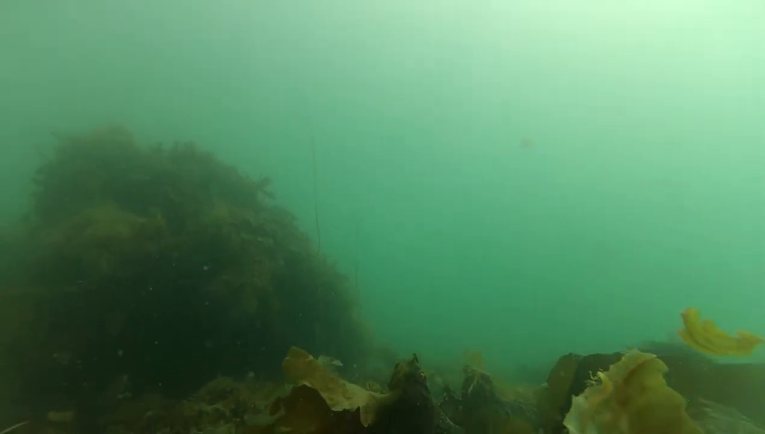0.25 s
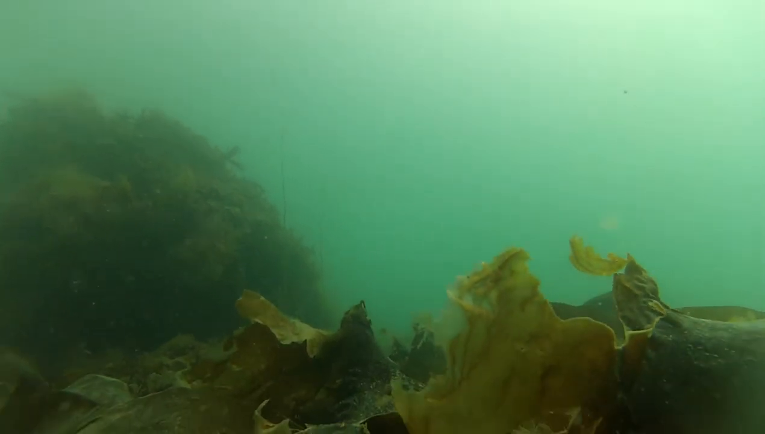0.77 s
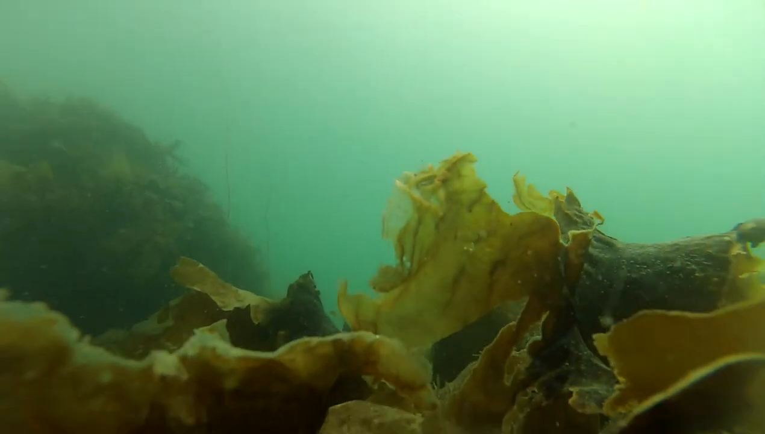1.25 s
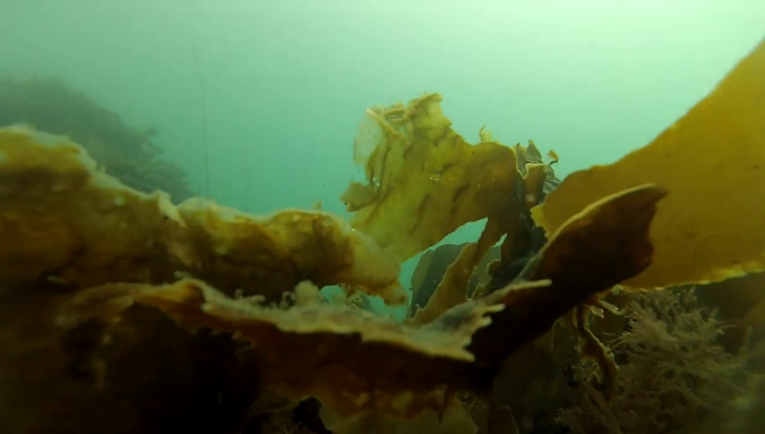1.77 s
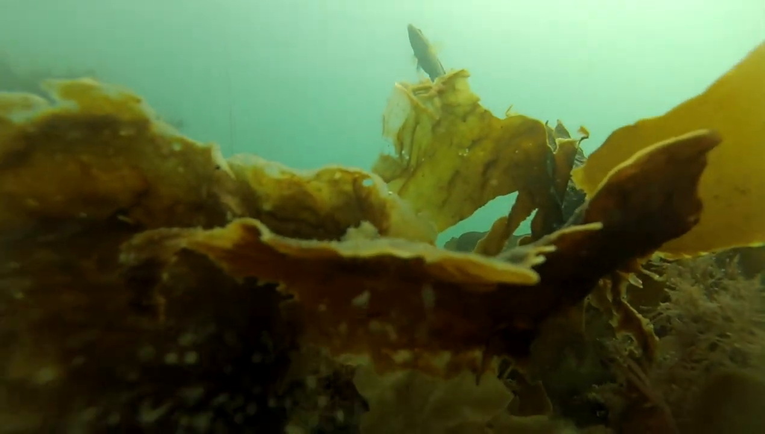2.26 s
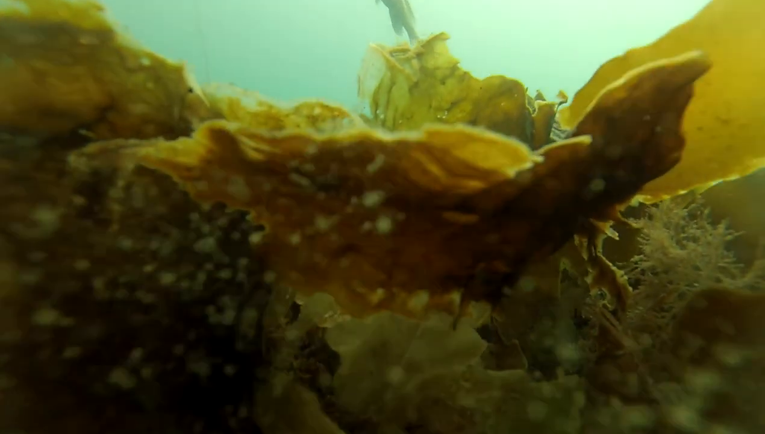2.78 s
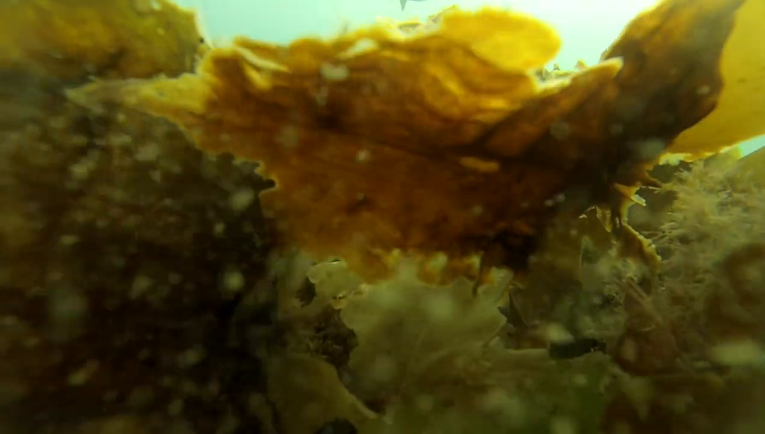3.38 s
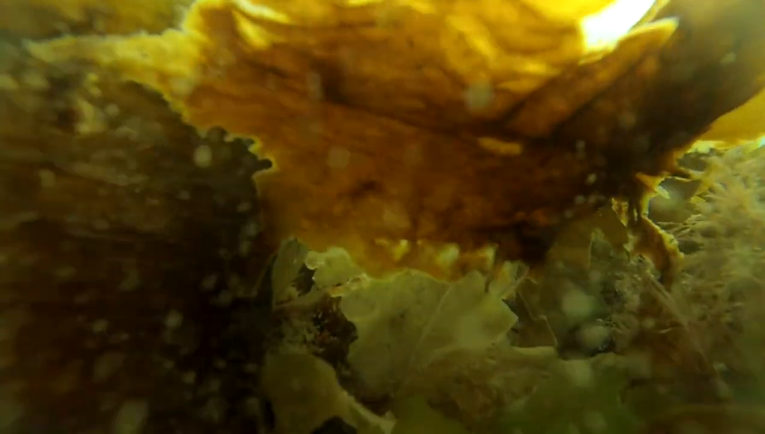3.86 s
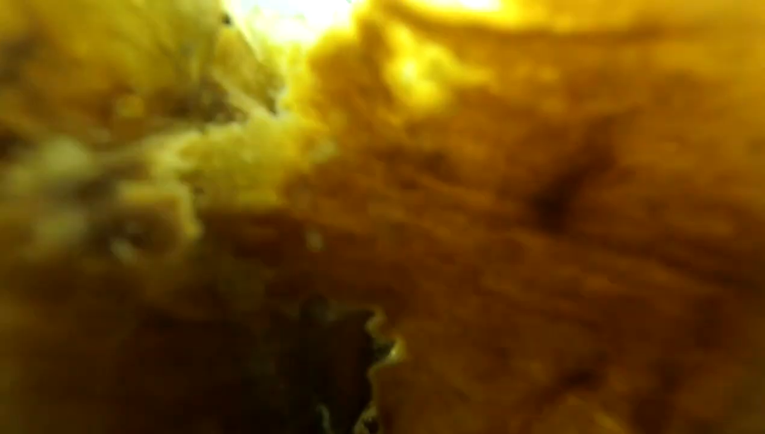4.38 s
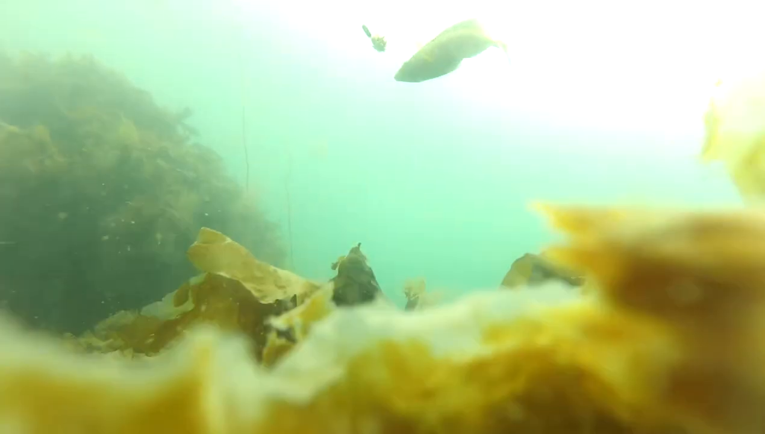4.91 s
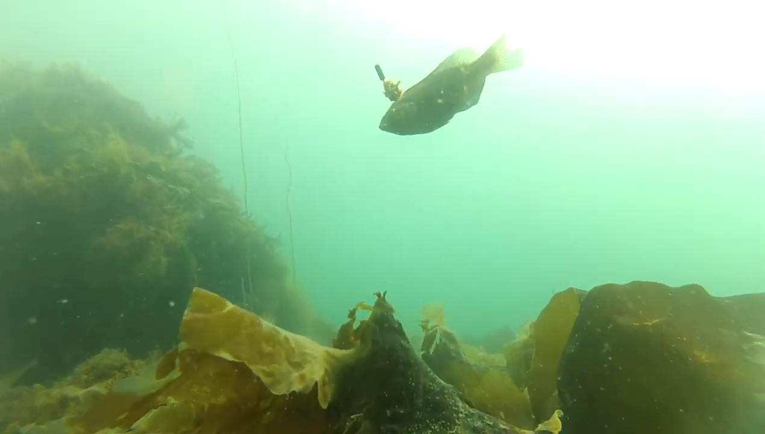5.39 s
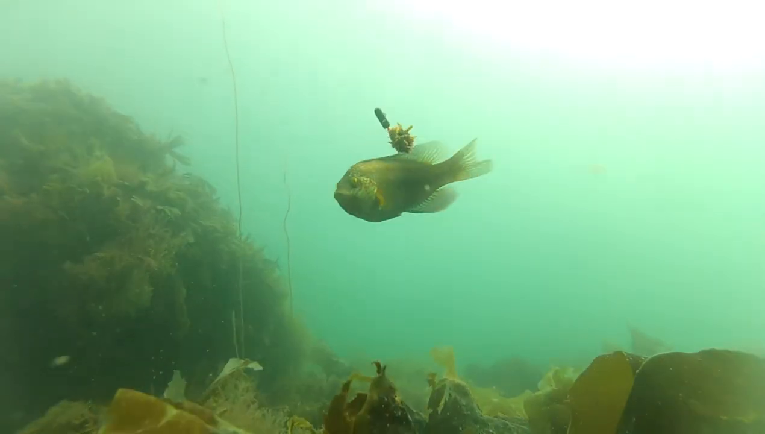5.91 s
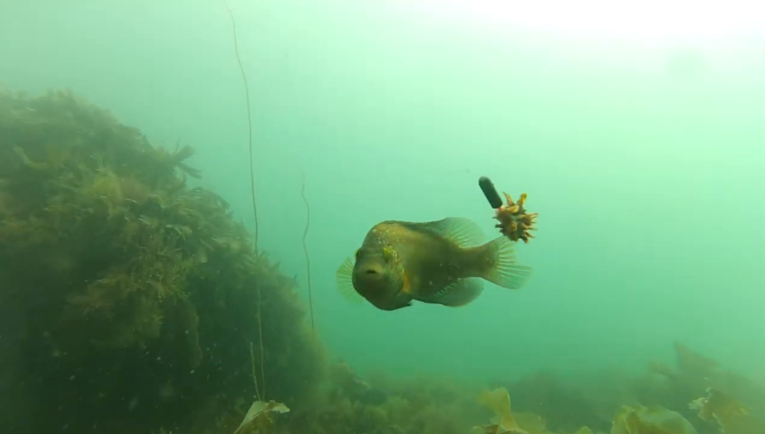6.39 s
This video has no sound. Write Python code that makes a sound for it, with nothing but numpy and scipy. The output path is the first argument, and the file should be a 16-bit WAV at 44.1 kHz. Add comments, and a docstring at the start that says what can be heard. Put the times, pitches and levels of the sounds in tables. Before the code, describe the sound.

A close, muffled, single-channel underwater sound, picked up through a camera's plastic-like shell. Low water buffeting and a dull hiss run throughout. Sparse stalk taps and soft frond rubs lead to a sudden clatter of hard knocks, then a short squeaking scrape that climbs and tightens. Heavier bumps, crackling rubs and quick scuffs continue among the kelp before contact eases away into soft rumble.

```python
"""A camera in a watertight housing drifts through a kelp bed on a line, heard from inside the housing.
From the start, water sways and shudders the rig over a dull hiss, while fronds rub and stalks bump it.
Around 3.4 s comes a thick cluster of knocks, and from 3.84 to 4.22 s a broad blade scrapes along.
Two smooth fronds swish by near 4.7 and 5.1 s, among more bumps, knocks and rubs, to the end.
Sliding is made of random tiny slips through filters; knocks and ticks ring the shell's resonances."""
import sys
import numpy as np
from scipy import signal
from scipy.fft import rfft, irfft
from scipy.io import wavfile
from scipy.ndimage import uniform_filter1d

SR = 44100
rng = np.random.default_rng(int(sys.argv[2]) if len(sys.argv) > 2 else 0)


def inscribe(sig):
    """Save sig as 16-bit PCM at rate SR to the path in sys.argv[1].

    A 1-D sig is mono; a 2-D sig holds one channel per row.
    Samples are clipped to [-1, 1] before scaling.
    """
    pcm = np.round(np.clip(np.atleast_2d(sig).T, -1, 1) * 32767)
    wavfile.write(sys.argv[1], SR, pcm.astype(np.int16))


N = 293265
TIME = np.arange(N) / SR

# "Relative" levels below are shifted by the layer's gain; spectra are scaled to one overall level.

# Steady hiss over time. Each row: time in seconds, relative level in dB.
HISS_LEVEL = [(0, 5), (.25, -0.5), (.7, 1.5), (3.3, 1.5), (5.2, 0), (6.65, -1)]
# Colour of the steady hiss. Each row: frequency in Hz, relative level in dB per Hz.
HISS_COLOUR = [(130, 4.5), (250, -0.5), (360, -2), (500, -3.5), (700, -3), (860, -9), (1100, -11),
               (1300, -16.5), (1750, -13), (2450, -15.5), (3000, -27), (4400, -28.5), (8000, -31),
               (15000, -34.5)]
# Hollow resonances in the hiss. Each row: frequency in Hz, width in Hz, relative rms level in dB.
HOLLOWS = [(1110, 180, -66), (1682, 300, -67), (3540, 700, -70), (4900, 230, -84)]
HISS_DB = -52.5  # relative to HISS_LEVEL
# Natural resonances (modes) of the housing. Each row: frequency in Hz, relative level in dB,
# time to fade by 60 dB in seconds.
SHELL_MODES = [(183, 1, 0.07), (217.4, 1.5, 0.092), (267, -11, 0.42), (384, -12.5, 0.045),
               (312, -22.5, 0.22), (431, -18.5, 0.23), (496, -19, 0.083), (517, 1.5, 0.021),
               (630, -14.5, 0.19), (665.2, -9, 0.24), (698.4, -15, 0.24), (845, -13, 0.051),
               (1044, -10, 0.05), (1093, -9.5, 0.036), (1413, -4.5, 0.025), (1620, -28, 0.02),
               (2110, -2, 0.017), (3450, -4.5, 0.014), (5200, -23, .01), (6850, -44, .008),
               (8600, -31, .0046), (10900, -29, .003)]
# Modes that ring longer than this colour the rubbing and the hiss.
RINGING_T60_S = 0.1

# Water pushing on the rig. Each row: time in seconds, relative level in dB.
BUFFET = [(0.0, -24), (0.16, -27), (0.68, -40), (0.78, -32.5), (0.83, -41), (1.33, -34), (1.68, -40),
          (2.98, -38.5), (3.06, -47), (3.48, -32), (3.71, -45), (3.8, -48), (3.89, -37), (4.98, -33),
          (5.02, -38.5), (5.2, -42.5), (5.215, -28), (5.97, -33), (6.03, -39.5), (6.24, -46.5), (6.65, -48)]
# Shudder of the housing on its mount. Each row: time in seconds, relative level in dB.
SHUDDER = [(0.0, -30), (0.52, -48.5), (1.05, -42.5), (1.35, -36.5), (1.59, -43.5), (2.3, -43.5),
           (3.18, -47.5), (4.33, -45), (4.54, -41), (5.11, -48.5), (5.81, -42), (6.65, -53.5)]
# Colour of the sway. Each row: frequency in Hz, relative level in dB per Hz.
SWAY_COLOUR = [(15, -6), (26, -2), (50, -6), (70, -5.5), (95, -34), (150, -34)]
# Colour of the shudder. Each row: frequency in Hz, relative level in dB per Hz.
MOUNT_COLOUR = [(60, -32.5), (85, -3), (115, 0.5), (140, -7.5), (175, -17.5), (240, -19.5), (330, -26.5),
                (500, -27)]

# Fronds sweeping over the shell. Each row: moment of firmest contact in seconds, rise and fall
# time constants in seconds, relative rub level in dB, relative hiss level in dB.
SWEEPS = [(.72, 0.2, 1, -48, -85), (1.1, 0.26, 0.27, -47, -69), (1.52, 0.091, 0.21, -48, -82),
          (2.2, 0.16, 0.049, -47, -88), (2.88, 0.32, 0.075, -50, -74), (3.33, 0.066, 0.1, -51, -76),
          (3.76, 0.041, 0.047, -48, -64), (3.94, 0.11, 0.03, -42, -80), (4.201, 0.36, 0.38, -44.5, -63.5),
          (4.39, 0.12, 0.16, -44, -67), (4.665, 0.029, 0.024, -43, -61), (4.82, 0.096, 0.074, -47.5, -65.5),
          (5.1, 0.094, 0.094, -65, -64.5), (5.225, 0.016, 0.11, -61, -59), (5.35, 0.031, 0.066, -48, -59),
          (5.48, 0.16, 0.076, -38.5, -63), (5.619, 0.022, 0.032, -40.5, -63.5),
          (5.833, 0.089, 0.092, -41.5, -62)]
# Colour of the dull rub. Each row: frequency in Hz, relative level in dB per Hz.
RUB_COLOUR = [(130, -6.5), (220, 8), (270, 6.5), (330, -7), (385, 3.5), (455, -4.5), (520, 4), (680, -3.5),
              (800, -3), (950, -12), (1280, -16.5), (1520, -16), (2300, -30), (3000, -26.5)]
# Colour of the fine hiss and crackle. Each row: frequency in Hz, relative level in dB per Hz.
FRICTION_COLOUR = [(800, -30), (1500, 11), (2300, 7.5), (3000, 0), (3650, 5), (4400, -4), (5300, 3),
                   (6200, -4.5), (6900, -1.5), (7800, -7.5), (8700, -9.5), (11000, -10), (15000, -43)]
# Loose grit crackles under the sliding fronds.
CRACKLES_PER_S, CRACKLE_SPREAD_DB = 170, 1.5

# Smooth fronds sliding by. Each row: moment of firmest contact in seconds, rise and fall time
# constants in seconds, rms level at firmest contact in dB.
SWISHES = [(4.73, 0.077, 0.091, -66.5), (5.07, 0.076, .07, -67)]
SWISH_HZ, SWISH_WIDTH_HZ = 5120, 640  # width of each of two filter passes

# An edge dragging past: mostly fronds' edges, while the bright rows from 4.05 to 4.24 s are # the broad blade's
# grain and its tail as it slips off. Each row: middle in seconds, half length in seconds, # relative rms level
# in dB, brightness in Hz.
RASPS = [(0.186, 0.054, -38, 437), (0.788, .02, -43, 420), (1.01, 0.043, -43, 500),
         (1.275, 0.063, -36.5, 262), (1.308, 0.045, -48, 620), (1.818, 0.033, -35.5, 300),
         (2.176, 0.25, -56, 1390), (2.274, 0.076, -45, 352), (3.457, 0.03, -43, 1090),
         (3.478, 0.07, -42, 516), (3.613, 0.005, -39, 706), (3.647, 0.018, -43, 480),
         (3.763, 0.038, -59, 2400), (4.053, 0.082, -54, 2600), (4.173, 0.036, -47.5, 3350),
         (4.24, 0.045, -55, 2520), (4.32, 0.1, -43, 740), (4.559, 0.013, -47.5, 1520),
         (4.592, 0.011, -49, 700), (4.674, 0.0083, -46, 1710), (4.833, 0.065, -44.5, 500),
         (5.002, 0.044, -57, 2080), (5.109, 0.024, -46.5, 970), (5.261, 0.015, -37, 680),
         (5.286, 0.0068, -33, 690), (5.347, 0.071, -40.5, 635), (5.407, 0.022, -38.5, 590),
         (5.494, 0.034, -39.5, 600), (5.616, .005, -58, 5500), (5.617, .006, -42.5, 1500),
         (5.631, 0.015, -35, 640), (5.831, 0.013, -45, 2090), (5.841, 0.041, -37, 666),
         (5.945, 0.074, -46, 714)]

# The broad blade takes hold, presses ever harder as its squeal rises, then slips off.
BLADE_START_S, BLADE_END_S = 3.84, 4.218
BLADE_ATTACK_S, BLADE_RELEASE_S = 0.12, 0.0069
BLADE_DB, BLADE_SWELL_DB_PER_S = -40, 22  # level relative to the squeal and grain gains
SQUEAL_HZ, SQUEAL_RISE_HZ_PER_S = 823, 120  # pitch at the start, and its climb
# Colour of the blade's fine slips. Each row: frequency in Hz, relative level in dB per Hz.
BLADE_COLOUR = [(400, -1), (700, 15), (870, 7), (1030, 3), (1290, 0.5), (1450, 5), (1900, -7), (2380, 1.5),
                (3000, -9.5), (3800, -0.5), (4450, -16), (5150, -12.5), (6800, -18), (8000, -30),
                (14000, -32)]
# Brief grips that make the wall sing. Each row: middle in seconds, half length in seconds,
# relative peak level in dB, average pitch in Hz.
SQUEAKS = [(2.887, 0.0028, -51, 3430), (2.955, 0.003, -50, 3440), (3.756, .0025, -53, 6700),
           (3.93, .007, -31.5, 804), (3.978, 0.0064, -32.5, 840), (4.019, .007, -33.5, 832),
           (4.057, 0.0067, -36, 833), (4.096, .008, -28, 863), (4.131, .008, -28, 858),
           (4.168, 0.0067, -24.5, 882), (4.211, 0.0082, -25, 847), (4.228, 0.0066, -38, 965),
           (5.474, 0.003, -24.5, 635), (5.482, 0.0038, -32, 614), (6.192, .006, -33.5, 678.4)]

# Soft bumps that rock the rig. Each row: start in seconds, relative peak level in dB, pitch in Hz.
BUMPS = [(0.002, -8, 54.8), (0.018, -14.5, 117), (0.041, -21, 61), (0.055, -30, 127), (0.086, -14, 58.7),
         (0.128, -24, 111), (0.219, -21, 52), (0.751, -16.5, 42.3), (1.106, -20.5, 102), (1.117, -18, 54.3),
         (1.298, -24.5, 108), (1.378, -17.5, 87), (1.45, -29, 104.8), (1.511, -23, 117),
         (1.832, -15.5, 109.5), (2.171, -22, 58.4), (2.26, -24, 112), (2.39, -25.5, 119), (2.625, -27, 125),
         (2.772, -25.5, 116), (2.805, -25, 108), (2.907, -21, 109), (2.949, -22.5, 42), (3.432, -18, 122),
         (3.505, -19.5, 94), (3.852, -22, 91), (3.915, -25, 47.6), (3.985, -22.5, 44.8), (4.31, -14, 55.7),
         (4.321, -14, 113), (4.345, -5.5, 114), (4.423, -13.5, 114), (4.503, -18, 103), (4.653, -19.5, 108),
         (4.66, -13, 36.7), (4.843, -14.5, 49), (4.95, -21, 46.7), (5.209, -17, 36.7), (5.212, -21, 104),
         (5.284, -13, 45), (5.326, -23, 127), (5.503, -14, 37), (5.615, -17.5, 101), (5.663, -15, 49),
         (5.814, -14, 36.3), (5.868, -16, 41.7)]
BUMP_T60_S = 0.12
# Grit ticking on the shell. Each row: start in seconds, relative peak level in dB, brightness in Hz.
TICKS = [(1.108, -39, 5500), (1.618, -41, 2090), (2.639, -35, 2320), (2.6392, -43, 8000),
         (3.4338, -28, 2900), (3.442, -29, 1820), (3.4682, -24, 1710), (3.4686, -32, 3000),
         (3.4778, -31, 1350), (3.505, -30, 1430), (3.6128, -32, 1440), (3.62, -38, 1400),
         (3.7585, -29.5, 2270), (3.761, -34, 2130), (3.76, -43, 6000), (3.825, -42, 5800),
         (4.312, -42, 1890), (4.348, -37, 3220), (4.349, -40, 8950), (4.374, -43, 3200), (4.391, -44, 3500),
         (4.407, -46, 3500), (4.562, -34.5, 3580), (4.5625, -41.5, 8500), (4.644, -34, 2330),
         (4.661, -35, 1900), (4.672, -38, 5170), (4.766, -36, 1390), (4.812, -36, 1470), (4.828, -38, 1700),
         (5.253, -43, 2500), (5.287, -38, 1900), (5.335, -50, 3500), (5.364, -42, 6000),
         (5.4385, -42, 9500), (5.441, -33.5, 6900), (5.444, -31, 1880), (5.497, -42, 6000),
         (5.795, -52, 4030), (5.818, -34, 1890), (5.824, -44, 2430), (5.829, -36, 6000),
         (5.832, -27.5, 2050), (5.837, -28, 1880), (5.838, -45, 7000), (5.861, -28.5, 1710),
         (5.87, -41, 6000), (6.156, -35, 1600), (6.1602, -30, 1250), (6.1602, -39, 5500)]
# Stalks knocking on the shell. Each row: start in seconds, relative peak level in dB,
# centre of the blow's spectrum in Hz.
KNOCKS = [(1.109, -19, 290), (1.23, -19, 252), (1.258, -28.5, 590), (1.274, -23, 270), (1.299, -21.5, 285),
          (1.311, -41, 560), (1.403, -28, 620), (1.494, -24, 254), (1.617, -26.5, 853), (1.815, -39, 402),
          (1.823, -32, 212), (2.255, -30, 300), (2.392, -32, 252), (2.625, -27, 277), (2.954, -25, 577),
          (3.394, -23.5, 204), (3.4, -25.5, 900), (3.407, -15, 287), (3.4281, -15.5, 565),
          (3.4335, -1, 318), (3.44, -8, 447), (3.451, -25, 300), (3.4592, -10, 206), (3.464, -14, 543),
          (3.4775, -26, 990), (3.478, -3.5, 336), (3.4825, -12, 400), (3.505, -16.5, 543),
          (3.509, -17, 213), (3.521, -32, 203), (3.53, -37, 470), (3.6128, -17, 810), (3.614, -17, 434),
          (3.619, -22, 416), (4.094, -16, 710), (4.226, -18, 282), (4.272, -17.5, 330), (4.297, -24.5, 190),
          (4.323, -22, 220), (4.3438, -11, 246), (4.39, -19, 510), (4.407, -16.5, 580), (4.412, -39, 530),
          (4.506, -35, 218), (4.561, -18, 690), (4.645, -19.5, 378), (4.659, -36, 337), (4.677, -32, 230),
          (4.765, -29, 260), (4.786, -23, 326), (4.811, -33, 373), (4.84, -18.5, 262), (4.895, -26, 298),
          (5.24, -13.5, 425), (5.285, -20.5, 720), (5.32, -22.5, 696), (5.4225, -16.5, 594),
          (5.442, -9.5, 576), (5.459, -20.5, 330), (5.473, -22, 514), (5.495, -14, 426),
          (5.6153, -12.5, 333), (5.666, -25.5, 706), (5.667, -17.5, 237), (5.822, -19.5, 690),
          (5.839, -16.5, 510), (6.1606, -13.5, 570)]
# A knock also thuds the whole wall, more weakly as the blow gets brighter.
THUD_HZ, THUD_DB, THUD_LOSS_DB_PER_OCTAVE = 138, 9, 8.5

CUTOFF_HZ = 15250  # top of the microphone's range


def from_db(db):
    """Turn decibels into a gain."""
    return 10 ** (np.asarray(db) / 20)


def rms_one(x):
    """Scale a sound so that its rms strength is 1."""
    return x / np.sqrt(np.mean(x ** 2) + 1e-20)


def level_curve(rows):
    """Draw straight lines between (seconds, dB) points, giving dB at every sample."""
    seconds, db = np.transpose(rows)
    return np.interp(TIME, seconds, db)


def add(out, s, sound):
    """Mix a sound in at time s."""
    start = max(0, int(s * SR))
    out[start:start + len(sound)] += sound[:N - start]


def drift(rate):
    """Wander at random, taking a new direction rate times a second; rms 1."""
    steps = rng.standard_normal(8192)
    return rms_one(np.interp(TIME * rate, np.arange(len(steps)), steps))


def coloured(x, spectrum):
    """Filter a steady sound with a spectrum that falls away beyond its ends; rms 1."""
    hz, db = np.transpose(spectrum)
    octave = np.log2(np.maximum(np.arange(N // 2 + 1) * SR / N, 1))
    octaves_outside = np.abs(octave - np.clip(octave, np.log2(hz[0]), np.log2(hz[-1])))
    gain_db = np.interp(octave, np.log2(hz), db) - 24 * octaves_outside
    return rms_one(irfft(rfft(x) * from_db(gain_db), N))


def resonate(x, hz, width_hz):
    """Let one resonance ring, with gain 1 at its top."""
    r = np.exp(-np.pi * width_hz / SR)
    feed = np.array([1, 0, -1]) * (1 - r * r) / 2
    return signal.lfilter(feed, [1, -2 * r * np.cos(2 * np.pi * hz / SR), r * r], x)


def resonate_twice(x, hz, width_hz):
    """Pass through the same resonance twice, for steeper sides."""
    return resonate(resonate(x, hz, width_hz), hz, width_hz)


def evened(x, span_s):
    """Hold the strength of a random motion steady over a span."""
    power = uniform_filter1d(x * x, int(span_s * SR) + 1)
    return x / np.sqrt(np.maximum(power, 1e-9))


def slips(per_s, spread_db):
    """Stick-slip: tiny releases of uneven size at random moments; rms 1."""
    size_db = spread_db * np.minimum(rng.exponential(1, N), 3.5)
    sizes = from_db(size_db) * rng.choice([-1, 1], N)
    return rms_one(sizes * (rng.random(N) < per_s / SR))


def swell(s, rise_s, fall_s):
    """Pressure that grows to 1 at time s and dies away."""
    return np.exp(-np.minimum(np.maximum((s - TIME) / rise_s, (TIME - s) / fall_s), 20))


def through_shell(x, ring_db):
    """Steady sound keeps the longest-lived modes of the housing ringing; rms 1."""
    rings = np.zeros(N)
    for hz, _, t60 in SHELL_MODES:
        if t60 > RINGING_T60_S:
            rings += resonate(x, hz, np.log(1000) / (np.pi * t60))
    return rms_one(x + from_db(ring_db) * rings)


def strike(centre_hz, breadth, reach, scatter_db):
    """A contact dents the wall and rings its modes, favouring those near its own centre; peak 1."""
    t = TIME[:SR // 10]
    hz, db, t60 = np.transpose(SHELL_MODES)[:, :, None]
    mode_db = db + scatter_db * rng.standard_normal(hz.shape) - 60 * t / t60
    modes = from_db(mode_db) * np.cos(2 * np.pi * hz * t)
    dent = from_db(12) * np.exp(-t / 0.00093)
    sound = resonate_twice(modes.sum(axis=0) + dent, centre_hz, breadth * centre_hz)
    # Wet weed cushions the contact; reach sets how far its treble extends.
    treble_hz = min(900 + reach * centre_hz, 14000)
    sound = signal.sosfilt(signal.butter(4, treble_hz, fs=SR, output="sos"), sound)
    return sound / np.abs(sound).max()


def contacts(table, level_db, breadth, reach):
    """Every contact rings the shell; a higher centre, up to 1000 Hz, makes its band relatively narrower."""
    out = np.zeros(N)
    for s, db, hz in table:
        narrowing = (500 / min(hz, 1000)) ** .5
        blow = strike(hz, breadth * narrowing, reach, scatter_db=1.5)
        add(out, s, -from_db(db + level_db) * blow)
    return out


def still_water():
    """Steady random hiss, made hollow by the resonances of the closed housing."""
    noise = coloured(rng.standard_normal(N), HISS_COLOUR)
    hiss = from_db(HISS_DB) * through_shell(noise, ring_db=-2.5)
    for hz, width, db in HOLLOWS:
        hiss += from_db(db) * rms_one(resonate_twice(rng.standard_normal(N), hz, width))
    return from_db(level_curve(HISS_LEVEL)) * hiss


def water(buffet_db, shudder_db):
    """Eddies sway the whole rig as deep noise, and the housing shudders on its mount in small slips."""
    sway = evened(coloured(rng.standard_normal(N), SWAY_COLOUR), 0.0443)
    sway *= from_db(level_curve(BUFFET) + buffet_db)
    shudder = evened(coloured(slips(400, 2.55), MOUNT_COLOUR), 0.19)
    shudder *= from_db(level_curve(SHUDDER) + shudder_db)
    return (sway + shudder) * np.minimum(TIME / .008, 1)  # short fade-in


def fronds(rub_db, hiss_db, crackle_db, clump_db, hiss_clump_db):
    """Fronds catch and slip on the shell in clumps: a dull rub with a fine hiss and a crackle on top."""
    grip = drift(85)
    rub_power, hiss_power = 0, 0
    for s, rise_s, fall_s, sweep_rub_db, sweep_hiss_db in SWEEPS:
        pressure = swell(s, rise_s, fall_s)
        rub_power = rub_power + (from_db(sweep_rub_db) * pressure) ** 2
        hiss_power = hiss_power + (from_db(sweep_hiss_db) * pressure) ** 2
    rub = evened(through_shell(coloured(slips(650, 1.8), RUB_COLOUR), ring_db=-12.5), 0.05)
    rub *= np.sqrt(rub_power) * from_db(rub_db + clump_db * grip)
    fine = from_db(hiss_db + hiss_clump_db * grip) * coloured(slips(4000, 1.3), FRICTION_COLOUR)
    crackle = coloured(slips(CRACKLES_PER_S, CRACKLE_SPREAD_DB), FRICTION_COLOUR)
    return rub + np.sqrt(hiss_power) * (fine + from_db(crackle_db) * crackle)


def swishes():
    """Smooth sliding excites only a narrow, high band of the wall."""
    level = sum(from_db(db) * swell(s, rise_s, fall_s) for s, rise_s, fall_s, db in SWISHES)
    return level * rms_one(resonate_twice(rng.standard_normal(N), SWISH_HZ, SWISH_WIDTH_HZ))


def rasps(level_db, breadth, reach):
    """An edge drags past: a brief swell of slips rings the shell."""
    out, grains = np.zeros(N), slips(1300, 1.8)
    for s, length, db, hz in RASPS:
        near = np.abs(TIME - s) < 2 * length
        ring = strike(hz, breadth, reach, scatter_db=3.5)
        ringing = evened(signal.fftconvolve(grains[near], ring)[:near.sum()], 0.019)
        shape = np.exp(-2 * ((TIME[near] - s) / length) ** 2)
        out[near] += from_db(db + level_db) * shape * ringing
    return out


def blade(squeal_db, grain_db, width_hz, flutter_db):
    """The blade squeals roughly at one rising pitch and sprays fine slips into higher wall resonances."""
    held_s = np.clip(TIME, BLADE_START_S, BLADE_END_S) - BLADE_START_S
    release = np.exp(-np.clip((TIME - BLADE_END_S) / BLADE_RELEASE_S, 0, 20))
    touch = np.minimum(held_s / BLADE_ATTACK_S, 1) * release
    level_db = BLADE_DB + BLADE_SWELL_DB_PER_S * held_s + flutter_db * drift(220)
    # Slow noise on a cosine and a sine turns the pure pitch into a rough band around it.
    smoother = signal.butter(2, width_hz / 2, fs=SR, output="sos")
    wander = signal.sosfilt(smoother, rng.standard_normal((2, N)))
    phase = 2 * np.pi * np.cumsum(SQUEAL_HZ + SQUEAL_RISE_HZ_PER_S * held_s) / SR
    squeal = evened(wander[0] * np.cos(phase) + wander[1] * np.sin(phase), 0.013)
    grain = coloured(slips(4000, 1.8), BLADE_COLOUR)
    return touch * from_db(level_db) * (from_db(squeal_db) * squeal + from_db(grain_db) * grain)


def squeaks(level_db, waver):
    """A frond, or the broad blade during its scrape, grips for an instant: a tone swells and lets go smoothly,
    a little unsteady in pitch."""
    out, unsteady = np.zeros(N), 1 + waver * drift(300)
    for s, length, db, hz in SQUEAKS:
        near = np.abs(TIME - s) < 3 * length
        tone = np.sin(2 * np.pi * hz * np.cumsum(unsteady[near]) / SR)
        shape = np.exp(-((TIME[near] - s) / length) ** 2)
        out[near] += from_db(db + level_db) * shape * tone
    return out


def bumps(level_db, rise_cycles):
    """A soft push builds over part of a cycle, then the rig swings and settles."""
    out, t = np.zeros(N), TIME[:SR // 3]
    for s, db, hz in BUMPS:
        rise = 1 - np.exp(-t * hz / rise_cycles)
        decay = np.exp(-np.log(1000) * t / BUMP_T60_S)
        swing = -np.sin(2 * np.pi * hz * t) * rise * decay
        add(out, s, from_db(db + level_db) * swing / np.abs(swing).max())
    return out


def ticks(level_db, breadth, reach):
    """Bits of grit strike the shell and ring mostly its higher modes."""
    return contacts(TICKS, level_db, breadth, reach)


def knocks(level_db, breadth, reach):
    """Each stalk rings the shell and thuds on its wall."""
    thuds = []
    for s, db, hz in KNOCKS:
        thud_db = db + THUD_DB - THUD_LOSS_DB_PER_OCTAVE * np.log2(hz / THUD_HZ)
        thuds.append((s, thud_db, THUD_HZ))
    rings = contacts(KNOCKS, level_db, breadth, reach)
    return rings + contacts(thuds, level_db, breadth, reach)


def scene():
    """Everything reaches the one microphone through the shell."""
    background = still_water() + water(buffet_db=2.5, shudder_db=4.0)
    rubbing = fronds(rub_db=2.5, hiss_db=6.5, crackle_db=-1.0, clump_db=1.8, hiss_clump_db=3.0)
    rubbing += swishes() + rasps(level_db=-1.0, breadth=0.66, reach=6.5)
    scrape = blade(squeal_db=-6.5, grain_db=-6.5, width_hz=120, flutter_db=0.7)
    scrape += squeaks(level_db=-2.6, waver=0.027)
    blows = bumps(level_db=-2.5, rise_cycles=0.1)
    blows += ticks(level_db=-2.0, breadth=0.97, reach=1.48)
    blows += knocks(level_db=-9.0, breadth=0.66, reach=4.8)
    return (background + rubbing + scrape + blows)[None]  # one channel


def record(dry):
    """The microphone passes no steady pressure; the top is cut steeply."""
    moving = signal.sosfilt(signal.butter(1, 10, "high", fs=SR, output="sos"), dry)
    return signal.sosfilt(signal.ellip(12, .1, 90, CUTOFF_HZ, fs=SR, output="sos"), moving)


dry = scene()
out = record(dry)
inscribe(out)
```